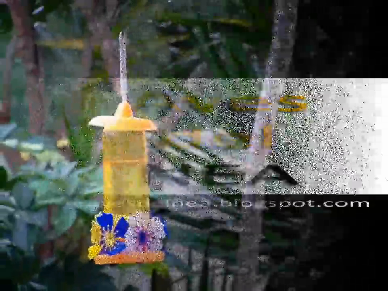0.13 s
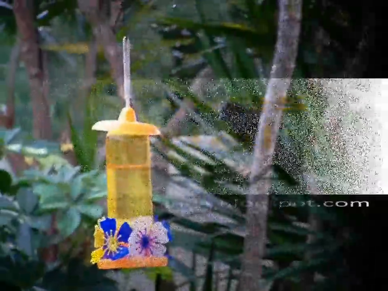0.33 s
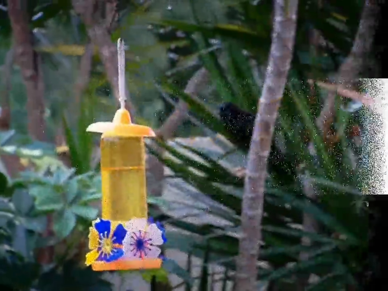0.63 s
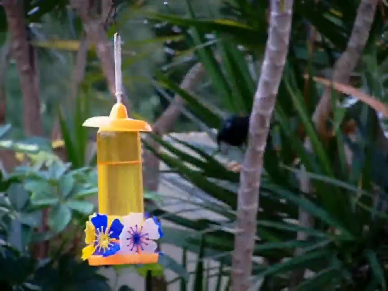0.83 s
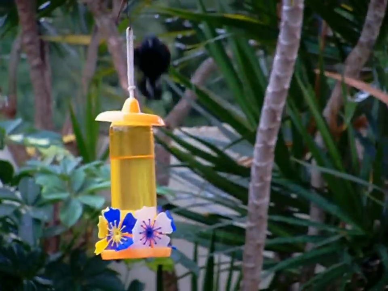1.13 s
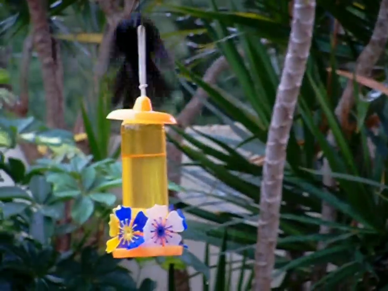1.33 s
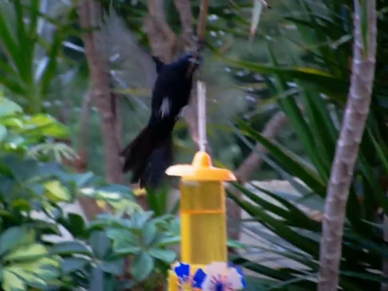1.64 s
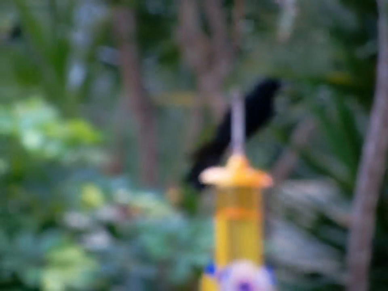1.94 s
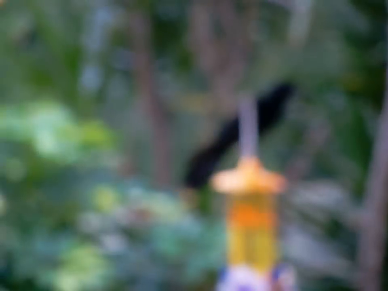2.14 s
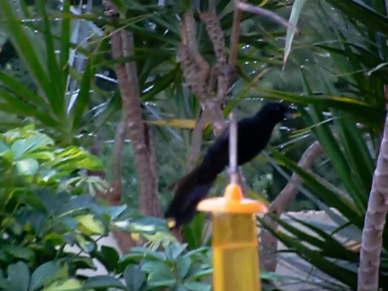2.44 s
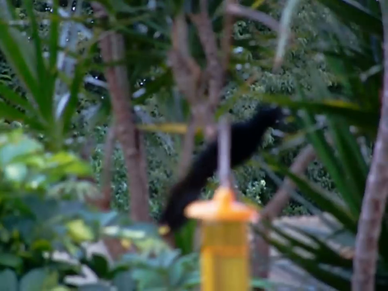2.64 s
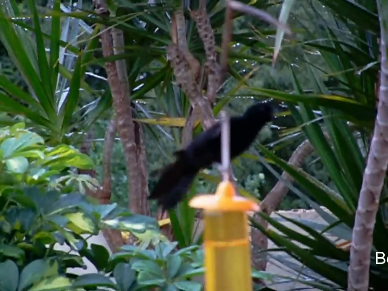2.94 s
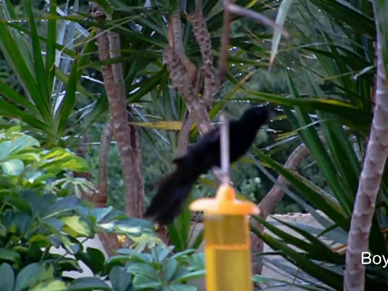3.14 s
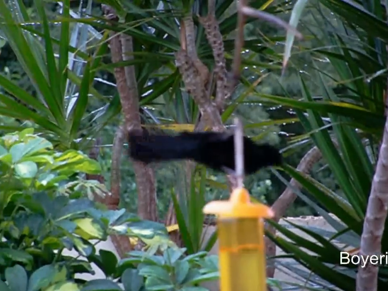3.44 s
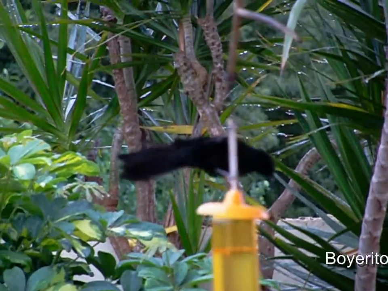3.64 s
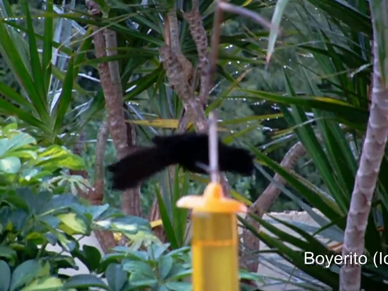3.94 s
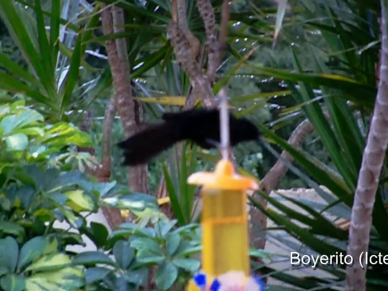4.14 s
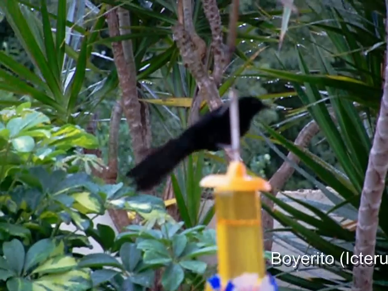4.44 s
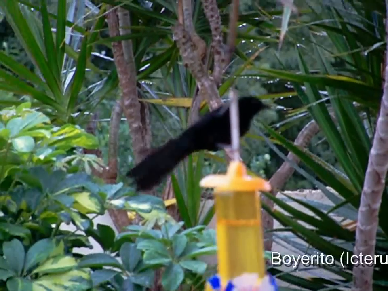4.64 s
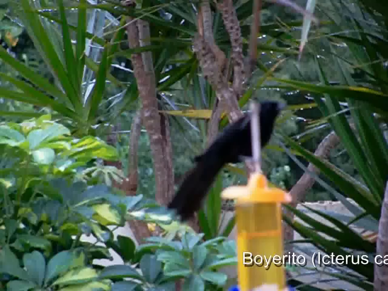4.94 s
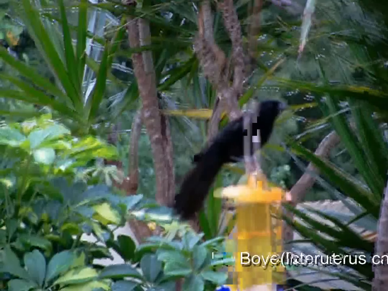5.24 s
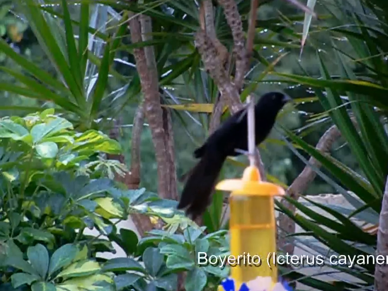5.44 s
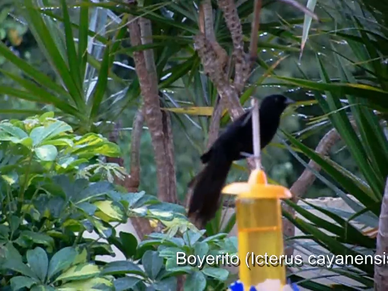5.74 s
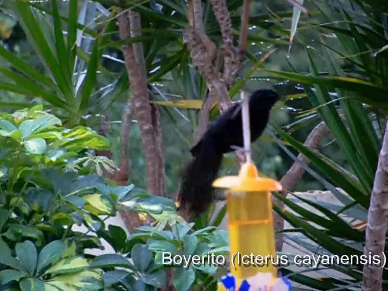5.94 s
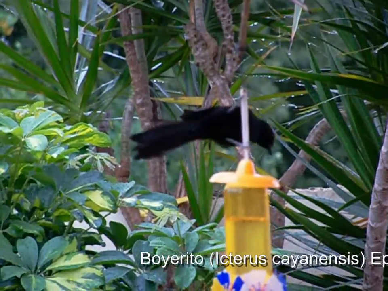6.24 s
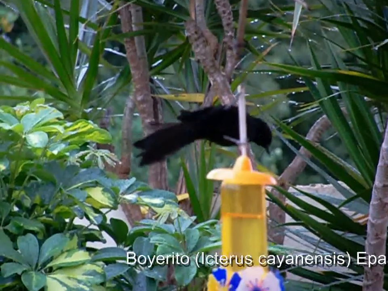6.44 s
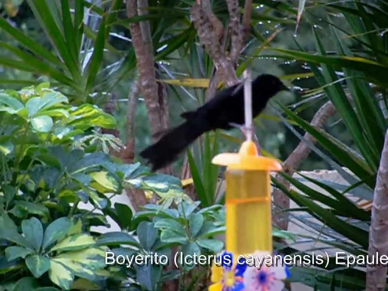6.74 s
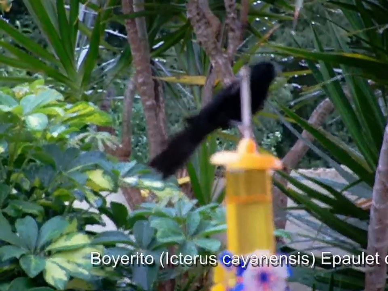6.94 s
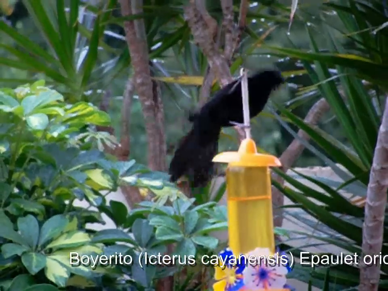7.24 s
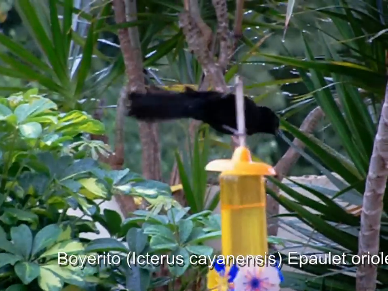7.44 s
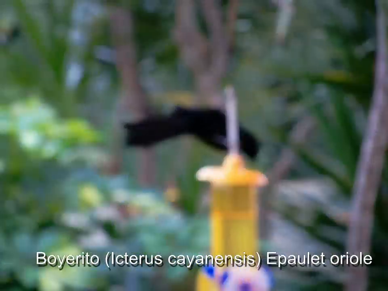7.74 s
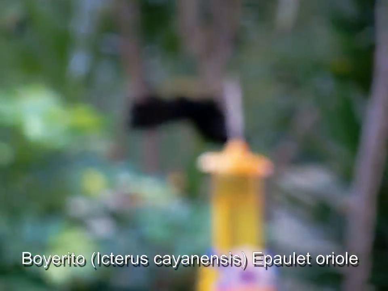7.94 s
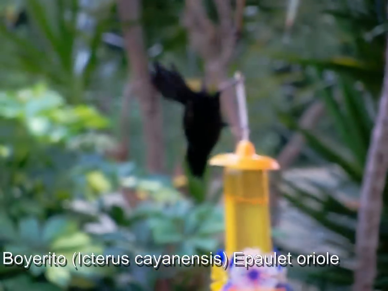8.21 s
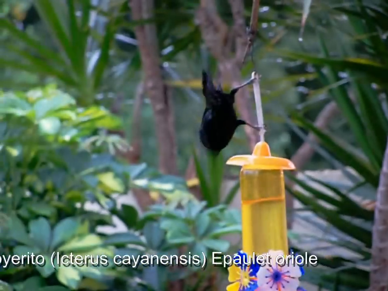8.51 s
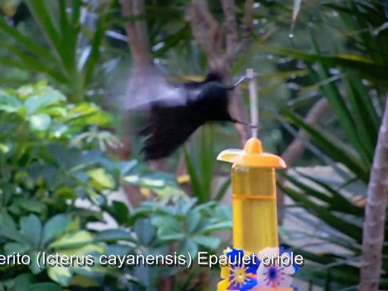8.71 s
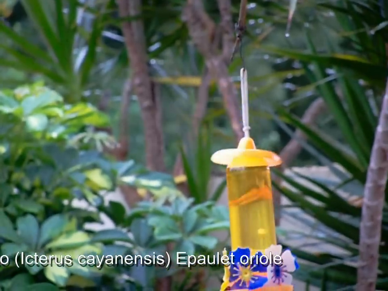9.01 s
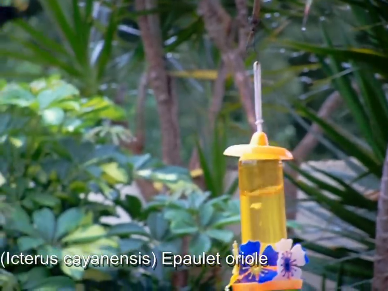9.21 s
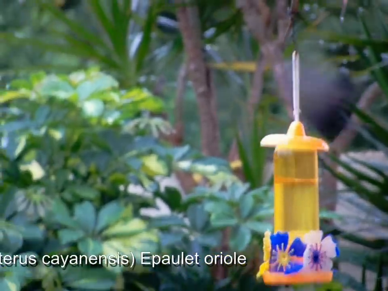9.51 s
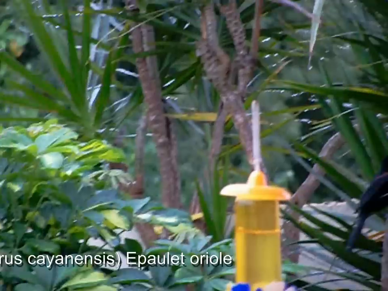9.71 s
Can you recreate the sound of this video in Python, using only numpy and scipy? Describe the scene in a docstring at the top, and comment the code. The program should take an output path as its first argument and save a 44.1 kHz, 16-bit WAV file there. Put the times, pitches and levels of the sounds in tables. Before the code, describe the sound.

In a garden, a nearby bird gives a sharp chip while a small bird ticks thinly farther off. Wings rustle briefly, then come another chip, a nasal note that rises and falls, a hoarse rasp and a creak breaking into a whistle. Three more nasal notes, a quick flutter and a last chip follow. The calls echo lightly over soft far traffic, leaf hiss and a faint camera whine, in mono.

```python
"""An oriole calls from a garden feeder: sharp chips, nasal arched notes, a rasp, and a creak that
breaks into a whistle. Its voice box makes a stack of tones that its throat shapes; shaking them and
adding breath noise makes it hoarse. Its wings and feet rustle as it lands and leaves, and small birds
tick, trill and whistle farther off. Walls and leaves echo each sound over a soft rumble of far
traffic, a hiss of leaves and a camera's faint whine."""
import sys
import numpy as np
from scipy import signal
from scipy.fft import rfft, irfft, next_fast_len
from scipy.io import wavfile

SR = 44100
rng = np.random.default_rng(int(sys.argv[2]) if len(sys.argv) > 2 else 0)


def dump_mix(stems):
    """Bounce the given channels to the path in sys.argv[1] as a 16-bit WAV at rate SR."""
    frames = np.atleast_2d(stems).T  # one column per channel
    limited = np.clip(frames, -1, 1)  # hard clip at full scale
    pcm = np.round(limited * 32767).astype(np.int16)
    wavfile.write(sys.argv[1], SR, pcm)


N = 435266
TIME = np.arange(N) / SR
CUTOFF_HZ = 12100   # the top of the treble

# Far traffic. Each row: time in seconds, base level of the rumble in dB, and of the murmur in dB.
TRAFFIC_LEVELS = [(0.0, -57.5, -62.5), (0.82, -53.5, -58), (1.73, -54, -58.5), (4.73, -57, -62.5),
                  (6.07, -55.5, -62.5), (6.92, -56.5, -63.5), (7.28, -59, -65.5), (9.87, -54, -62)]
# The camera's whine. Each row: pitch in Hz, level in dB.
WHINE_TONES = [(963, -76), (1926, -77.5), (5800, -88), (7705, -99.5)]
# Echoes from nearby walls. Each row: delay in seconds, level in dB against the direct sound.
WALL_ECHOES = [(.0075, -6.5), (0.014, -16.5), (0.0221, -12.5)]
# The colour of each noise (how dull or bright it is). Each row: frequency in Hz, relative level in dB.
TRAFFIC_COLOUR = [(12, -48.5), (20, -1.5), (85, -1.5), (124, -6.5), (260, -12.5), (305, -12.5), (722, -16),
                  (899, -16.5), (974, -17), (1030, -16), (1740, -23), (1890, -22.5), (2400, -53.5),
                  (3120, -52), (5280, -120)]
LEAF_COLOUR = [(1200, -20), (2000, 3), (3200, 6.5), (4300, 1), (5400, 4), (6300, -3.5), (7400, 0),
               (8200, -22), (12000, -12.5)]
BIRD_TICK_COLOUR = [(1000, -34), (3800, -21), (5000, 2), (6200, 4), (7400, 10.5), (8500, -9), (10000, -16),
                    (13000, -32)]
BIRD_TRILL_COLOUR = [(1000, -52), (7200, -31.5), (7800, 8), (8300, -11), (9000, -29.5), (13000, -41.5)]
RUSTLE_COLOUR = [(300, -20), (1700, -10.5), (2400, -13), (3100, 2), (4000, -3.5), (5000, -6), (6500, -16),
                 (8000, -28), (12000, -45)]
# How the throat shapes each kind of call. Each row: frequency in Hz, boost or cut in dB.
CHIP_SHAPE = [(1000, -11), (2000, -3), (3000, 4), (3800, -6), (4800, 11.5), (5800, 3.5), (6500, -8),
              (7400, -7.5), (8400, -41), (12000, -21)]
NASAL_SHAPE = [(1000, -3), (1500, -1), (2050, -15.5), (2500, 3.5), (3100, 13), (4100, -3), (4800, -5.5),
               (6050, -16.5), (6600, -18.5), (7400, -12), (8300, -38), (12000, -37)]
RASP_SHAPE = [(1000, -25.5), (1450, -17), (2000, -25), (2500, 13), (3100, 10), (3700, -0.5), (4300, -13.5),
              (6100, -13.5), (7200, -15), (8300, -41), (12000, -48)]
CREAK_SHAPE = [(900, -8), (1250, -6), (1900, 3), (2500, 6.5), (3000, 8.5), (3900, -6), (4700, -20.5),
               (6000, -16), (7400, -16), (12000, -61)]
WHISTLE_SHAPE = [(1000, -8), (1800, 6.5), (3100, 17.5), (4000, -8), (6000, -18.5), (8000, -16.5),
                 (12000, -56)]

# Far birds. Each row: start and length in seconds, first and last pitch in Hz, level in dB,
# roughness from 0 (clear) to 1 (hoarse).
FAR_WHISTLES = [(0.711, 0.027, 4870, 4350, -48.5, 0.31), (2.60, 0.16, 3390, 3360, -65, 0.19),
                (3.87, 0.037, 3090, 2760, -60.5, 0), (9.638, 0.038, 3000, 2785, -70, .3)]
# A small bird's ticks. Each row: time in seconds, relative level in dB.
BIRD_TICKS = [(0.465, -40.5), (0.4898, -44), (0.5217, -45), (0.5697, -43), (0.62, -42.5), (0.6794, -43),
              (0.7144, -45), (0.7344, -45), (0.7927, -42), (0.8344, -45.5), (0.8544, -45), (1.254, -46),
              (1.2844, -48), (1.3119, -48), (1.697, -46.5), (1.726, -51)]
# Its trill. Each row: start in seconds, relative level of the last and loudest pulse in dB.
BIRD_TRILLS = [(3.114, -48)]
# Wing strokes and scuffs on the feeder. Each row: time in seconds, relative level in dB.
RUSTLES = [(1.873, -39.5), (1.889, -46), (5.919, -56), (8.742, -50.5), (8.768, -44.5), (8.802, -49),
           (8.809, -36.5), (8.882, -41), (8.895, -38), (9.073, -46.5)]
# The oriole's chips. Each row: start and length in seconds, top pitch in Hz, base level in dB,
# swell during the rise in dB, level of the lower tone against the upper in dB.
CHIP_CALLS = [(0.08, 0.032, 5850, -30, 13, -18), (2.079, 0.043, 5516, -26.5, 4, -3),
              (9.425, 0.027, 5570, -28, 12, -9)]
# Its arched notes. Each row: start and length in seconds, place of the crest as a share of the length,
# top pitch in Hz, base level in dB, swell from start to end in dB, brightness in dB per octave.
ARCH_CALLS = [(2.846, 0.16, 0.49, 2056, -32, 3, 1.5), (6.091, 0.17, 0.5, 2092, -35.5, 5.5, 0),
              (6.885, 0.154, 0.5, 2088, -33, 3.5, -0.5), (7.365, 0.16, 0.51, 2023, -37, 1, 0.5)]
# Its rasp and its whistle. Each row: start and length in seconds, base level in dB.
RASP_CALLS = [(3.949, .146, -23.5)]
WHISTLE_CALLS = [(5.026, .075, -24.5)]
# Its creak. Each row: time in seconds, pitch in Hz, base level in dB, roughness (capped at 1).
CREAK_PATH = [(4.922, 1605, -45.5, 1), (4.937, 1480, -31.5, 0.9), (4.948, 1258, -46.5, 1.1),
              (4.970, 1092, -43, 1.05), (4.985, 1233, -48.5, .2), (5.004, 1203, -41, 0.3),
              (5.028, 1330, -42, .15)]


def from_db(db):
    """Turn decibels into a number to multiply by."""
    return 10 ** (np.asarray(db) / 20)


def unit_power(x):
    """Scale a signal so that its average power is 1."""
    return x / np.sqrt(np.mean(x ** 2) + 1e-20)


def gain_at(colour, hz):
    """How strongly a colour or throat shape lets a frequency through."""
    points, db = np.transpose(colour)
    return from_db(np.interp(np.log(np.maximum(hz, 1)), np.log(points), db))


def filtered(x, order, hz, kind):
    """Keep the "low" or "high" side of a frequency; a higher order cuts more sharply."""
    return signal.sosfilt(signal.butter(order, hz, kind, fs=SR, output="sos"), x)


def noise(colour, size=N):
    """Steady noise of a given colour."""
    n = next_fast_len(size)
    spectrum = rfft(rng.standard_normal(n)) * gain_at(colour, np.fft.rfftfreq(n, 1 / SR))
    return unit_power(irfft(spectrum, n)[:size])


def flutter(rate_hz, size):
    """Random wavering, up to about the given rate."""
    return unit_power(filtered(rng.standard_normal(size + 2000), 2, rate_hz, "low")[2000:])


def puffs(events, colour, rise_s, decay_s):
    """Short puffs of noise that swell and die."""
    power = np.zeros(N)
    for peak_s, db in events:
        age = TIME - peak_s + rise_s
        span = (age > 0) & (age < .5)
        rise = np.minimum(age[span] / rise_s, 1)
        decay = np.exp(-np.maximum(age[span] - rise_s, 0) / decay_s)
        power[span] += (from_db(db) * rise * decay) ** 2
    return np.sqrt(power) * noise(colour)


def glide(start, length, from_hz, to_hz, db, bend, peak, rise_db, fall_db, rough):
    """Path of a sliding note: rows of time, pitch, level and roughness (given as first, last)."""
    share = np.linspace(0, 1, 60)   # how far through the note we are
    pitch = from_hz + (to_hz - from_hz) * share ** bend
    level = db - np.interp(share, [0, peak, 1], [rise_db, 0, fall_db])
    return np.column_stack([start + share * length, pitch, level, np.linspace(*rough, 60)])


def bird_note(path, throat, jitter, shimmer_db, breath):
    """The voice box makes tones that the throat shapes; roughness shakes them and adds breath noise."""
    times, *columns = np.transpose(path)
    span = np.flatnonzero((TIME >= times[0]) & (TIME <= times[-1]))
    t, size = TIME[span], len(span)
    pitch, level, rough = (np.interp(t, times, column) for column in columns)
    rough = np.clip(rough, 0, 1)
    shaky_pitch = pitch * (1 + jitter * rough * flutter(500, size))
    phase = 2 * np.pi * np.cumsum(shaky_pitch) / SR
    harmonics = np.arange(1, 9)[:, None]   # whole multiples of the pitch
    gains = gain_at(throat, harmonics * pitch) * (harmonics * pitch < CUTOFF_HZ)
    tone = np.sum(gains * np.sin(harmonics * phase), axis=0) / np.sqrt(np.sum(gains ** 2, axis=0) / 2)
    hiss = breath * rough * noise(throat, size)
    voice = (tone + hiss) / np.sqrt(1 + (breath * rough) ** 2)
    flicker = from_db(shimmer_db * rough * (flutter(150, size) - 1))
    fade = np.clip(np.minimum(t - t[0], t[-1] - t) / .004, 0, 1)   # 4 ms at each end
    out = np.zeros(N)
    out[span] = voice * flicker * from_db(level) * fade
    return out


def traffic_and_leaves(split_hz=250):
    """Far traffic rumbles and murmurs; the hiss of leaves rises and falls with the murmur."""
    times, *columns = np.transpose(TRAFFIC_LEVELS)
    rumble_db, murmur_db = (np.interp(TIME, times, column) for column in columns)
    rumble = unit_power(filtered(noise(TRAFFIC_COLOUR), 3, split_hz, "low"))
    murmur = unit_power(filtered(noise(TRAFFIC_COLOUR), 3, split_hz, "high"))
    leaves = from_db(murmur_db - 4.5) * noise(LEAF_COLOUR)
    return from_db(rumble_db + 1.66) * rumble + from_db(murmur_db + .1) * murmur + leaves


def camera_whine():
    """A camera gives off a few faint tones that waver slightly."""
    return sum(np.sqrt(2) * from_db(db) * np.sin(2 * np.pi * hz * TIME + .45 * flutter(10, N))
               for hz, db in WHINE_TONES)


def garden_echoes(sound, first_per_s=250, thickening_s=.02):
    """The direct sound, a few wall echoes, then ever more echoes from trunks and leaves."""
    age = TIME[:SR]
    crowding = 1 + (age / thickening_s) ** 2
    response = np.zeros(SR)
    for fade_s, db in ((.3, -4), (.66, -16.5)):   # near, then far
        arrives = (rng.random(SR) < first_per_s * crowding / SR) & (age > .003)
        # the more echoes share the energy, the weaker each one is
        scatter = arrives * rng.choice([-1, 1], SR) * from_db(-60 * age / fade_s) / np.sqrt(crowding)
        response += from_db(db) * scatter / np.linalg.norm(scatter)
    response[0] = 1
    for delay, db in WALL_ECHOES:
        response[round(delay * SR)] += from_db(db)
    return signal.fftconvolve(sound, response)[:N]


def far_whistles():
    """Distant birds whistle faint notes that slide down."""
    out = np.zeros(N)
    for *slide, rough in FAR_WHISTLES:
        path = glide(*slide, bend=.82, peak=.4, rise_db=3, fall_db=5, rough=(rough, rough))
        out += bird_note(path, WHISTLE_SHAPE, jitter=.084, shimmer_db=.5, breath=.1)
    return out


def ticks():
    """A small bird's thin ticks: tiny puffs of high noise."""
    return from_db(-5) * puffs(BIRD_TICKS, BIRD_TICK_COLOUR, rise_s=.0014, decay_s=.0056)


def trill(count=4, gap_s=.063, step_db=2.5):
    """The small bird's very high trill: evenly spaced pulses that grow louder."""
    pulses = [(start + k * gap_s, db - step_db * (count - 1 - k))
              for start, db in BIRD_TRILLS for k in range(count)]
    return from_db(-7.5) * puffs(pulses, BIRD_TRILL_COLOUR, rise_s=.005, decay_s=.0073)


def wings_and_feet():
    """The oriole's wings beat and its feet scuff the feeder in short, dry rustles."""
    return from_db(-2) * puffs(RUSTLES, RUSTLE_COLOUR, rise_s=.002, decay_s=.0035)


def chips(start_hz=1517, rise_s=.0155, sag_hz_per_s=7700, fade_db_per_s=260):
    """The pitch shoots up as the voice clears; then the voice box's other side adds a lower tone."""
    out = np.zeros(N)
    for start, length, top_hz, db, swell_db, lower_db in CHIP_CALLS:
        age = np.linspace(0, length, 60)
        risen = np.minimum(age / rise_s, 1)
        held_s = np.maximum(age - rise_s, 0)
        pitch = start_hz * (top_hz / start_hz) ** risen - sag_hz_per_s * held_s
        level = db - swell_db * (1 - risen ** 1.76) - fade_db_per_s * held_s
        rough = np.interp(risen ** 3, [0, 1], [.99, .097])
        upper = np.column_stack([start + age, pitch, level, rough])
        lower = np.column_stack([start + age, .845 * pitch, level + lower_db, rough])[held_s > 0]
        for path in (upper, lower):
            out += bird_note(path, CHIP_SHAPE, jitter=.1, shimmer_db=3, breath=1.1)
    return out


def arched_notes(clearing_s=.032, dip_db=4, push_db=2.5, second_hz=2750):
    """A nasal note starts hoarse, clears as it rises, then grows louder and frays as it drops."""
    share = np.linspace(0, 1, 60)
    middle_dip = dip_db * np.sin(np.pi * share) ** 2
    late_push = push_db * np.exp(-((share - .85) / .081) ** 2)
    out = np.zeros(N)
    for start, length, crest, top_hz, db, swell_db, brightness in ARCH_CALLS:
        age = share * length
        from_crest = 2 * (share - crest)
        pitch = top_hz * (1 - .14 * from_crest ** 2 - .25 * from_crest ** 6)   # round top, steep ends
        level = db + late_push - middle_dip + swell_db * (share - .5)
        rough = .74 * np.exp(-(age / clearing_s) ** 2) + .56 * share ** 7
        path = np.column_stack([start + age, pitch, level, rough])
        # the treble is strongest when the beak is raised towards the listener
        throat = [(hz, boost + brightness * np.log2(hz / top_hz)) for hz, boost in NASAL_SHAPE]
        out += bird_note(path, throat, jitter=.05, shimmer_db=6, breath=.4)
        # a rough second voice comes and goes during the rise
        second = glide(start, .055, second_hz, second_hz, db - 9,
                       bend=1, peak=.2, rise_db=5, fall_db=13.5, rough=(.6, .56))
        out += bird_note(second, WHISTLE_SHAPE, jitter=.08, shimmer_db=4, breath=.22)
    return out


def rasp(pip_s=.0075, top_hz=1840):
    """A short pip, then a hoarse note that swells; both sides of the voice box slide down together."""
    out = np.zeros(N)
    for start, length, db in RASP_CALLS:
        pip = [(time, top_hz, db - 5, .3) for time in (start, start + pip_s)]
        main = glide(start, length, from_hz=top_hz, to_hz=1280, db=db,
                     bend=1.65, peak=.64, rise_db=19, fall_db=14, rough=(.86, .41))
        second = glide(start, length, from_hz=2520, to_hz=1380, db=db - 13.5,
                       bend=1.1, peak=.17, rise_db=8.5, fall_db=7, rough=(.88, .18))
        for path in (pip, main):
            out += bird_note(path, RASP_SHAPE, jitter=.085, shimmer_db=6, breath=.65)
        out += bird_note(second, WHISTLE_SHAPE, jitter=.09, shimmer_db=8, breath=.1)
    return out


def creak_and_whistle():
    """A rough creak clears and breaks into a pure whistle that droops, frays and dies."""
    out = bird_note(CREAK_PATH, CREAK_SHAPE, jitter=.07, shimmer_db=3.5, breath=.5)
    for start, length, db in WHISTLE_CALLS:
        path = glide(start, length, from_hz=3090, to_hz=1912, db=db,
                     bend=2, peak=.32, rise_db=8, fall_db=18.5, rough=(.01, .47))
        out += bird_note(path, WHISTLE_SHAPE, jitter=.08, shimmer_db=3, breath=.3)
    return out


def scene():
    """The birds echo around the garden over the background, in one channel."""
    oriole = chips() + arched_notes() + rasp() + creak_and_whistle()
    small_birds = far_whistles() + ticks() + trill()
    birds = garden_echoes(oriole + small_birds + wings_and_feet())
    return (birds + traffic_and_leaves() + camera_whine())[None]


def record(dry, mirror_hz=8000, edge_hz=8200, mirror_db=-3, leak_db=-41):
    """The camera's low sample rate mirrors the treble; only a trace gets through above the edge."""
    treble = filtered(dry, 4, 5200, "high")
    # multiplying by this tone flips the treble around mirror_hz
    mirror_tone = 2 * np.cos(2 * np.pi * 2 * mirror_hz * TIME)
    mirrored = dry + from_db(mirror_db) * mirror_tone * treble
    kept = filtered(mirrored, 24, edge_hz, "low")
    trace = from_db(leak_db) * filtered(mirrored, 4, edge_hz, "high")
    steep_cut = signal.ellip(10, .1, 80, CUTOFF_HZ, fs=SR, output="sos")
    return signal.sosfilt(steep_cut, kept + trace)


dry = scene()
out = record(dry)
dump_mix(out)
```